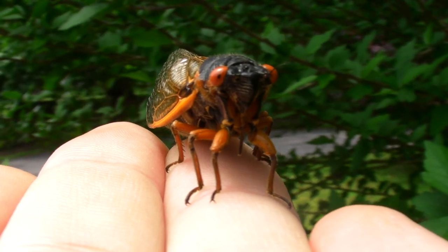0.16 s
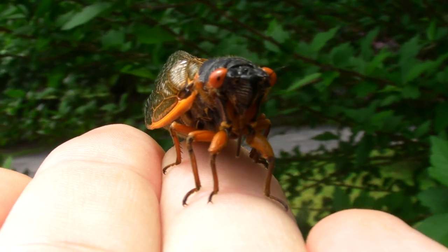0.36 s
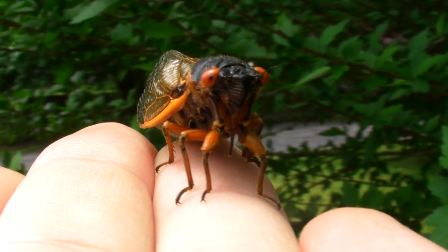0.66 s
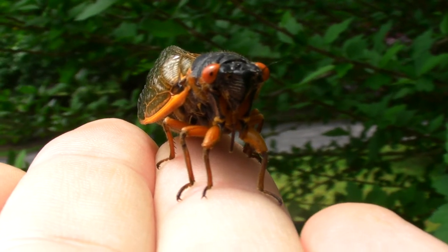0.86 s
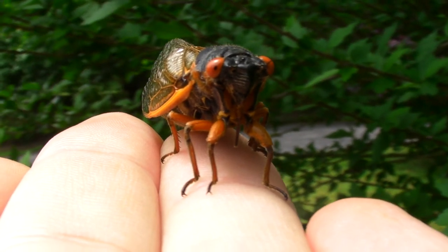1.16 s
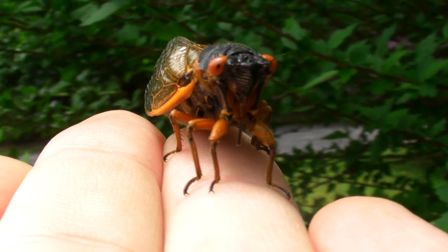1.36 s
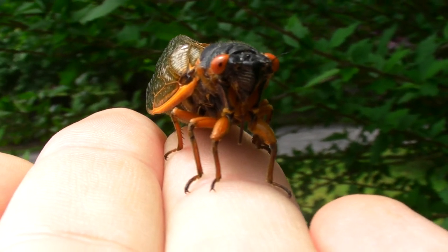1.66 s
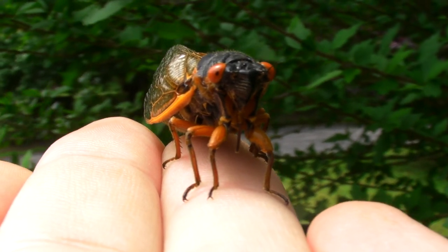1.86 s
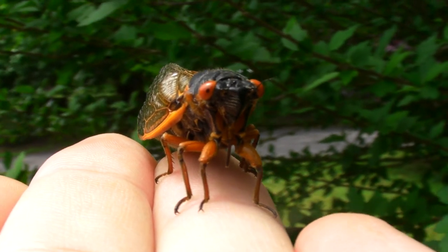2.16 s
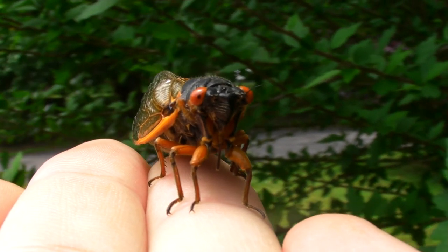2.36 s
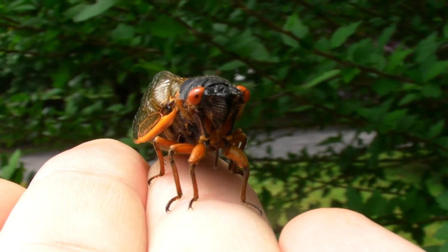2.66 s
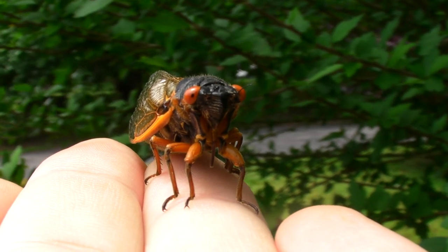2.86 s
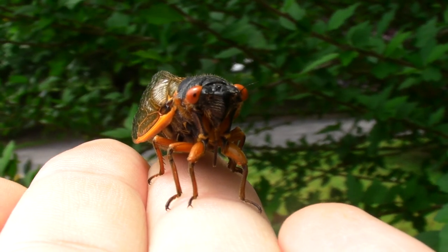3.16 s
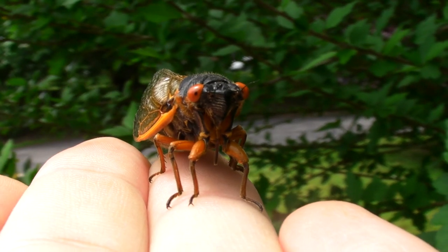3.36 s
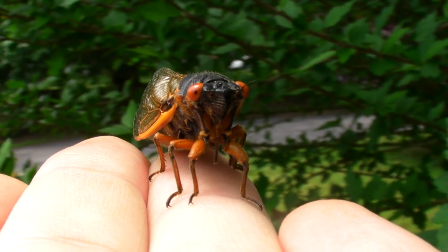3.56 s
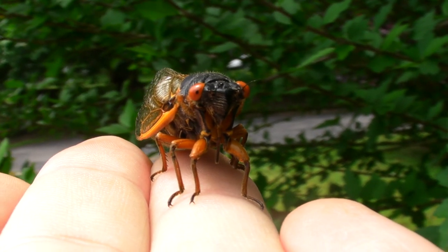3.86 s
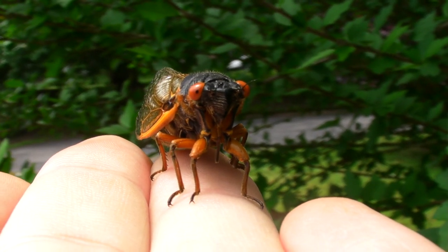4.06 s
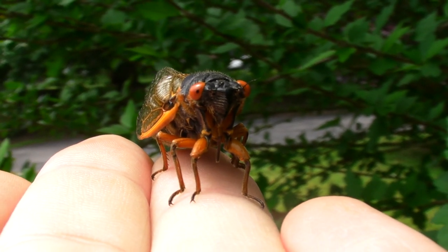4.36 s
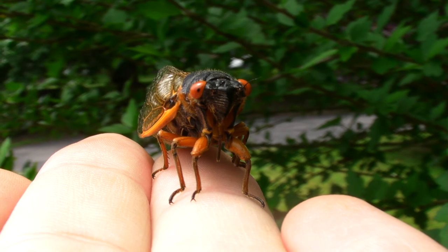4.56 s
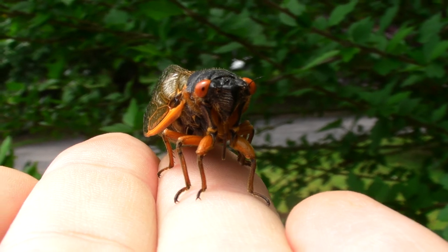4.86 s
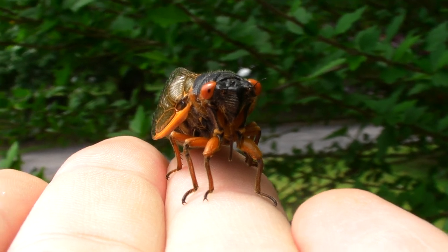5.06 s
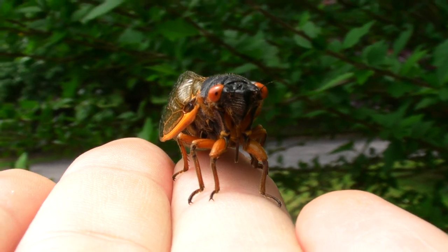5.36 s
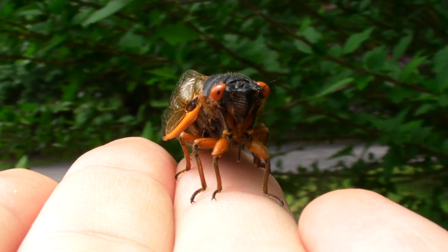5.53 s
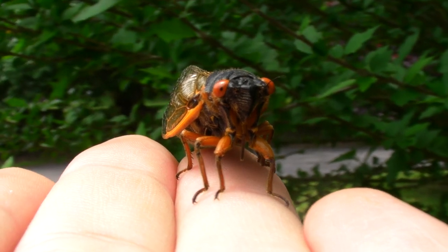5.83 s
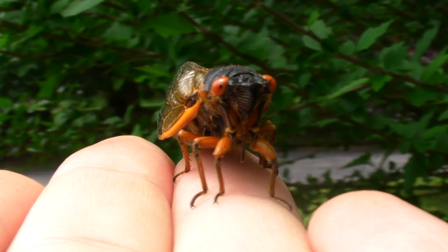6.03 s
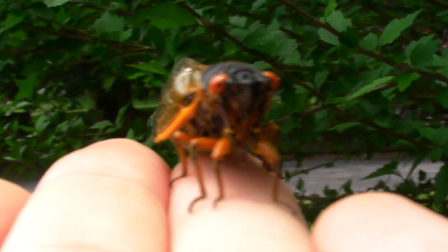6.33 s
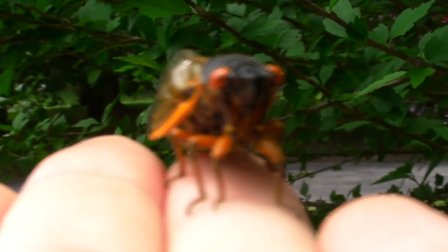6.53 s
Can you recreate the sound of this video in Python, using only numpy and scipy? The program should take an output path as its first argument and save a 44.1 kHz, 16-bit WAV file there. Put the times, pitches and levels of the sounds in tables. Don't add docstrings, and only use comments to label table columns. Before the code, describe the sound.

Countless cicadas hold one unbroken, wavering hum in leafy surroundings, while a far bird whistles briefly and fingers bump and tick against the camera.

```python
import sys
import numpy as np
from scipy import signal
from scipy.fft import rfft, irfft, next_fast_len
from scipy.io import wavfile
from scipy.ndimage import uniform_filter1d, map_coordinates

SR = 44100
rng = np.random.default_rng(int(sys.argv[2]) if len(sys.argv) > 2 else 0)


def unload_audio(sound):
    columns = np.transpose(np.atleast_2d(sound))
    steps = np.round(np.clip(columns, -1, 1) * 32767)
    wavfile.write(sys.argv[1], SR, steps.astype(np.int16))


def volts_from_decibels(level):
    exponent = np.asarray(level, float) / 20
    return 10 ** exponent


N = 295330


def unit(x):
    return x / np.sqrt(np.mean(x ** 2) + 1e-20)


def along(points, hz):
    point_hz, value = np.transpose(points)
    return np.interp(np.log(hz + 1), np.log(point_hz + 1), value)


def curves(rows):
    seconds, *columns = np.transpose(rows)
    return [np.interp(np.arange(N) / SR, seconds, column) for column in columns]


def wobble(rate, count=1):
    knots = rng.standard_normal((count, 400))
    return np.array([map_coordinates(k, [np.arange(N) * rate / SR], order=1) for k in knots])


def filtered(x, response):
    size = next_fast_len(N + 8192)
    return irfft(rfft(x, size) * response(np.fft.rfftfreq(size, 1 / SR)), size)[..., :N]


def panned(x, pan_db):
    return x * volts_from_decibels(np.outer([.5, -.5], pan_db - np.mean(pan_db)))


# frequency in Hz, likeness from 0 to 1.
PORT_LIKENESS = [(25, 0.88), (110, .95), (300, .87), (700, 0.55), (1200, 0.7), (2500, 0.43), (5000, 0.053),
                 (15000, 0.05)]
# frequency in Hz, lead of the left port in radians.
PORT_LEAD = [(650, 0), (1300, -0.32), (2600, -0.6), (2850, -3.0), (3900, -4.2), (5500, -2.5), (6500, -6.5),
             (10000, -9)]


def ports(pair):
    def mid_and_side(hz):
        turn = np.arccos(np.clip(along(PORT_LIKENESS, hz), 0, 1)) / 2
        return np.array([np.cos(turn), np.sin(turn)])

    mid, side = filtered(pair, mid_and_side)
    left_right = np.array([mid + side, mid - side])
    return filtered(left_right, lambda hz: np.exp(np.outer([.5j, -.5j], along(PORT_LEAD, hz))))


def sacs(modes):
    def gain(hz):
        power = 0
        for center, width, db in modes:
            resonance = hz * width / (center * center - hz * hz + 1j * hz * width)
            power = power + volts_from_decibels(2 * db) * np.abs(resonance) ** 4
        return np.sqrt(power)
    return gain


def swarm(click_hz, swell_db, count):
    singers = 2 * count
    singer = np.arange(singers)[:, None]
    own_hz = click_hz * rng.uniform(.8, 1.2, (singers, 1))
    gaps = SR / own_hz * (1 + .12 * rng.standard_normal((singers, 3000)))
    at = np.cumsum(gaps, axis=1).astype(int)
    swell_knots = rng.standard_normal((singers, 12))
    swell = map_coordinates(swell_knots, [singer + 0 * at, at / SR / .7], order=1)
    click_db = swell_db * swell + 2 * rng.standard_normal(at.shape)
    click = volts_from_decibels(click_db) * rng.choice([-1, 1], at.shape)
    slot = at + N * (singer % 2)
    return np.bincount(slot[at < N], click[at < N], 2 * N).reshape(2, N)


def hiss(spectrum, patchy_db):
    bins = signal.stft(rng.standard_normal((2, N)), nperseg=512)[2]
    field = uniform_filter1d(rng.standard_normal(bins.shape[1:]), size=8, axis=0)
    patches = unit(uniform_filter1d(field, size=14, axis=1))
    pair = signal.istft(bins * volts_from_decibels(patchy_db * patches), nperseg=512)[1][:, :N]
    return unit(filtered(pair, lambda hz: volts_from_decibels(along(spectrum, hz))))


def soloists(pitch_hz, spread_hz, waver_hz, count):
    own_hz = pitch_hz + spread_hz * np.linspace(-1, 1, count)[:, None]
    pitch = own_hz + waver_hz * (wobble(2.5, count=count) + 0.609 * wobble(30, count=count))
    swell_db = 4 * wobble(3, count=count) + 2.5 * wobble(25, count=count)
    tones = volts_from_decibels(swell_db) * np.sin(2 * np.pi * np.cumsum(pitch, axis=1) / SR)
    return unit(np.array([tones[::2].sum(axis=0), tones[1::2].sum(axis=0)]))


# time in seconds, level in dB, left-right tilt in dB.
DRONE_COURSE = [(0, -19.5, -3), (.9, -20.5, -2.8), (1.5, -18.5, -1.5), (2.4, -19.5, -1.5), (2.7, -21, -3),
                (3.0, -18.5, -2), (3.6, -19.5, -5), (4.2, -20, -2.5), (5.3, -20, -1), (5.7, -18, -1.5),
                (6.1, -20, -2), (6.7, -20, -1)]
# time in seconds, level in dB.
BUZZ_EFFORT = [(0, -42), (.5, -44.5), (1.3, -42.5), (2.0, -41.5), (4.1, -42.5), (4.5, -41.5), (5.4, -41),
               (6.7, -40.5)]
# center in Hz, width in Hz, level in dB.
HELD_SACS = [(1319, 153, 0), (1266, 170, -3), (1169.6, 130, -7.5), (1392, 156, -10.5), (1550, 140, -23.5)]
# center in Hz, width in Hz, level in dB.
END_SACS = [(871, 140, 2), (980, 190, -1)]
# center in Hz, width in Hz, level in dB.
OVERTONE_SACS = [(2453, 700, 1.5), (3790, 1070, 0.5), (2170, 1170, -1.5)]


def drone():
    level_db, pan_db = curves(DRONE_COURSE)
    effort_db, = curves(BUZZ_EFFORT)
    held = unit(filtered(swarm(140, swell_db=0.5, count=60), sacs(HELD_SACS)))
    held = unit(held + volts_from_decibels(-4.5) * soloists(1316, spread_hz=34, waver_hz=12, count=10))
    ends = unit(filtered(swarm(120, swell_db=4.5, count=20), sacs(END_SACS)))
    upper = unit(filtered(swarm(280, swell_db=1.5, count=30), sacs(OVERTONE_SACS)))
    ends_db = -20.5 - 1.4 * (level_db - level_db.mean()) + 0.49 * wobble(3)
    upper_db = -40.5 + 0.3 * (effort_db - effort_db.mean())
    crowd = volts_from_decibels(level_db + 1) * (held + volts_from_decibels(ends_db) * ends) + volts_from_decibels(upper_db) * upper
    return panned(ports(crowd), pan_db)


# center in Hz, width in Hz, level in dB.
FAR_BODIES = [(8360, 1470, 0), (9160, 840, -1.5), (9770, 940, -9)]
# center in Hz, width in Hz, level in dB.
NEAR_BODIES = [(8420, 1360, 5), (9300, 1100, -11)]
# center in Hz, width in Hz, level in dB.
RASP_BODIES = [(6770, 2500, 0), (5160, 3560, 0)]
# peak time in seconds, level in dB.
NEAR_BUZZES = [(0.0, -50), (0.314, -45), (.45, -48), (0.797, -46), (1.5, -42), (1.84, -45), (2.202, -47),
               (2.496, -44), (2.83, -46), (3.1, -42), (3.398, -47), (3.705, -45), (4.02, -47),
               (4.307, -42.5), (4.404, -43), (4.63, -44), (4.9, -47), (5.2, -45), (5.31, -40.5),
               (5.495, -51), (5.62, -44), (5.8, -42.5), (5.884, -46), (6.114, -42.5), (6.282, -47),
               (6.43, -40.5), (4.7, -52)]


def buzz():
    pulse_s, drift_db_per_s = .11, -0.27
    level_db, = curves(BUZZ_EFFORT)
    t = np.arange(N) / SR
    swells = np.array([volts_from_decibels(db) * np.exp(-(2 * (t - s) / pulse_s) ** 2) for s, db in NEAR_BUZZES])
    rasps = volts_from_decibels(-7.5 + 1 * rng.standard_normal(len(NEAR_BUZZES))) @ swells
    high = unit(filtered(swarm(300, swell_db=2.5, count=16), sacs(FAR_BODIES)))
    near = unit(filtered(swarm(300, swell_db=2.5, count=16), sacs(NEAR_BODIES)))
    low = unit(filtered(swarm(300, swell_db=0.0, count=16), sacs(RASP_BODIES)))
    rasp = unit(filtered(swarm(300, swell_db=0.0, count=16), sacs(RASP_BODIES)))
    low_db = -1 + (-.2 - 1) * (level_db - level_db.mean())
    crowd = volts_from_decibels(level_db + 3.0) * (high + volts_from_decibels(low_db) * low)
    near_tone = swells.sum(axis=0) * near * volts_from_decibels([[-1.5], [1.5]])
    near_rasp = rasps * rasp * volts_from_decibels([[1.5], [-1.5]])
    return panned(ports(crowd), drift_db_per_s * t) + volts_from_decibels(4.0) * (near_tone + near_rasp)


# time in seconds, rumble level in dB.
TRAFFIC_COURSE = [(0, -37), (1.5, -37), (3, -37), (4.5, -39), (5.3, -37.5), (6.7, -38)]
# frequency in Hz, density in dB per Hz.
RUMBLE_SPECTRUM = [(12, -44), (20, -15.5), (59, -1), (107, 2.5), (167, -5.5), (260, -13.5), (340, -30),
                   (570, -120)]
# frequency in Hz, density in dB per Hz.
ROAR_SPECTRUM = [(110, -15), (180, 1.5), (308, 0), (540, -7.5), (706, -6), (800, -5.5), (1040, -27),
                 (1760, -120)]
# frequency in Hz, density in dB per Hz.
LEAF_SPECTRUM = [(8000, 3), (10500, 6), (12000, -5), (14000, -9), (15100, -7), (15700, -16), (16500, -120)]


def background():
    rumble_db, = curves(TRAFFIC_COURSE)
    rumble = volts_from_decibels(rumble_db + 1.0 * wobble(3.82)) * hiss(RUMBLE_SPECTRUM, patchy_db=-0.2)
    roar = volts_from_decibels(-40.5 + 0.27 * wobble(2.97)) * hiss(ROAR_SPECTRUM, patchy_db=1.0)
    leaves = volts_from_decibels(-59 + 1 * wobble(2.5)) * hiss(LEAF_SPECTRUM, patchy_db=2.5)
    return ports(rumble + roar + leaves)


# time in seconds, level in dB.
FINGER_KNOCKS = [(.318, -46), (1.912, -38), (2.118, -40), (3.717, -37), (3.844, -38), (4.193, -43),
                 (4.565, -38), (4.988, -30), (5.061, -33), (5.283, -41), (5.308, -29), (5.341, -38),
                 (6.28, -34), (6.458, -35)]
# frequency in Hz, density in dB per Hz.
KNOCK_SPECTRUM = [(15, -6), (60, 0), (200, -3), (400, -12), (800, -22), (2000, -45), (4000, -120)]


def knocks():
    knock_s = .02
    t = np.arange(N) / SR
    pushes = sum(volts_from_decibels(db) * np.exp(-(2 * (t - s) / knock_s) ** 2) for s, db in FINGER_KNOCKS)
    return pushes * hiss(KNOCK_SPECTRUM, patchy_db=0)[0] * [[.75], [-.6]]


# start in seconds, peak level in dB, pitch in Hz, left-right tilt in dB.
DRY_TICKS = [(1.036, -52, 11300, -6), (3.2352, -32, 14000, 0), (3.2351, -34, 10500, -4),
             (4.323, -46, 11200, -3), (4.471, -48, 13500, 2), (5.277, -44, 12000, -6.5),
             (5.277, -32, 2450, 7), (5.325, -37, 2450, 4), (6.19, -41, 2500, 3), (6.212, -40, 2600, 0),
             (5.302, -48, 13000, 1), (5.320, -47, 11500, -4), (5.681, -43, 11000, 0),
             (6.270, -47, 11000, -2)]


def ticks():
    cycles = 25
    out = np.zeros((2, N + SR))
    t = np.arange(600) / SR
    for s, db, hz, pan_db in DRY_TICKS:
        decay = volts_from_decibels(db - 60 * t * hz / cycles)
        ping = decay * np.sin(2 * np.pi * hz * t) * (1 - np.exp(-t / .0002))
        sides = volts_from_decibels(np.array([pan_db, -pan_db]) / 2 + 10)
        out[:, round(s * SR):][:, :len(t)] += np.outer(sides, ping)
    return out[:, :N]


# start in seconds, length in seconds, first pitch in Hz, level in dB.
BIRD_NOTES = [
    (1.2, .1, 2785, -50),
    (1.3, .11, 2805, -46),
    (1.4, .11, 2778, -50),
    (1.58, .07, 2652, -51),
    (1.68, .2, 2705, -52),
    (1.92, .1, 2675, -46),
    (2.08, .14, 2655, -46),
    (2.23, .1, 2640, -52),
    (3.0, .14, 3025, -53),
    (3.28, .1, 2988, -53),
]


def bird():
    sag_hz_per_s = 150
    out = np.zeros(N)
    for s, length, first_hz, db in BIRD_NOTES:
        u = np.linspace(0, 1, int(length * SR))
        pitch = first_hz - sag_hz_per_s * length * u
        tone = np.sin(2 * np.pi * np.cumsum(pitch) / SR)
        out[round(s * SR):][:len(u)] += volts_from_decibels(db) * np.sin(np.pi * u) ** .6 * tone
    return out * volts_from_decibels(1.2 * wobble(25)) * [[1.1], [-.85]]


# start in seconds, length in seconds, first pitch in Hz, last pitch in Hz, level in dB.
ENGINE_PASSES = [
    (1.3, 1.5, 112, 108, -42),
    (4.85, .47, 180, 214, -45),
]


def engines():
    fade_s = 0.11
    t = np.arange(N) / SR
    out = np.zeros(N)
    for s, length, first_hz, last_hz, db in ENGINE_PASSES:
        fade = np.clip(np.minimum(t - s, s + length - t) / fade_s, 0, 1) ** 2
        hz = np.interp(t, [s, s + length], [first_hz, last_hz])
        out += volts_from_decibels(db) * fade * np.sin(2 * np.pi * np.cumsum(hz) / SR)
    return volts_from_decibels(3 * wobble(12)[0]) * out


def scene():
    return drone() + buzz() + background() + knocks() + ticks() + bird() + engines()


def band_limit(x):
    return signal.sosfilt(signal.butter(12, 15750, fs=SR, output="sos"), x)


# frequency in Hz, left-right difference in dB.
BODY_SHADE = [(60, 0.1), (500, 0.5), (1170, -3), (1790, -0.5), (2740, 8), (4190, 1.5), (9810, -0.5),
              (15000, -2.5)]


def record(dry):
    def response(hz):
        roll_off = 1 / (1 + (hz / 15500) ** 30)
        return roll_off * volts_from_decibels(np.outer([.5, -.5], along(BODY_SHADE, hz)))

    return band_limit(filtered(dry, response))


dry = scene()
out = record(dry)
unload_audio(out)
```